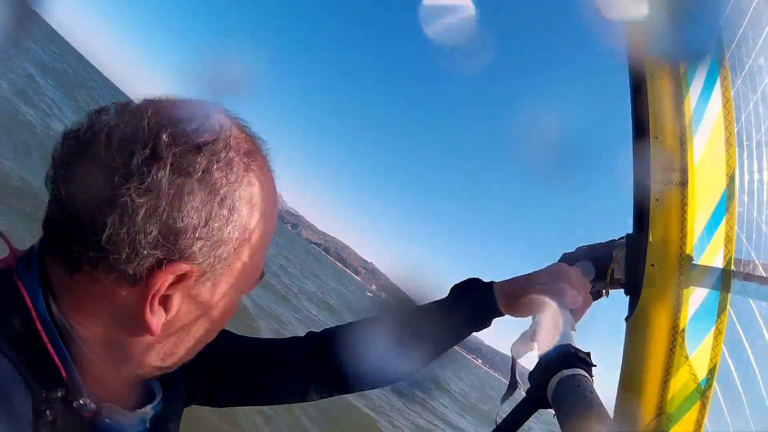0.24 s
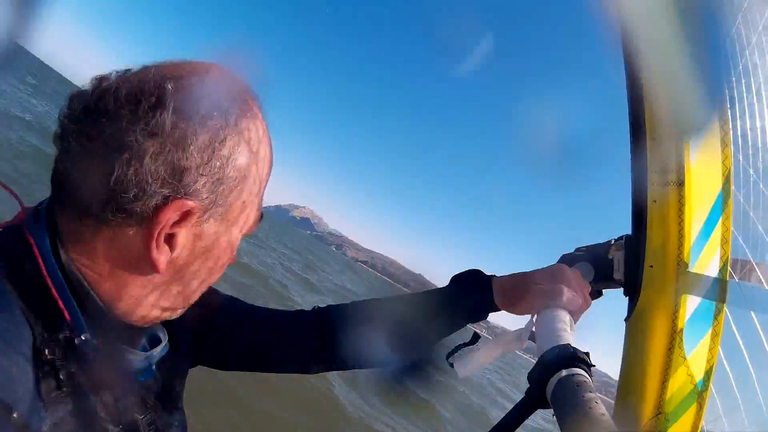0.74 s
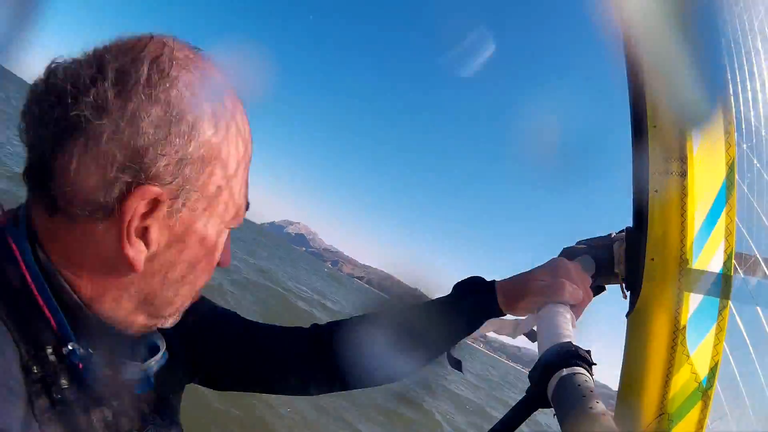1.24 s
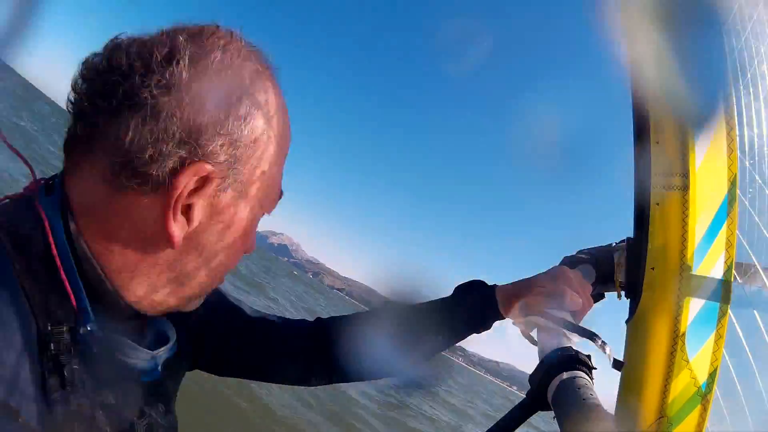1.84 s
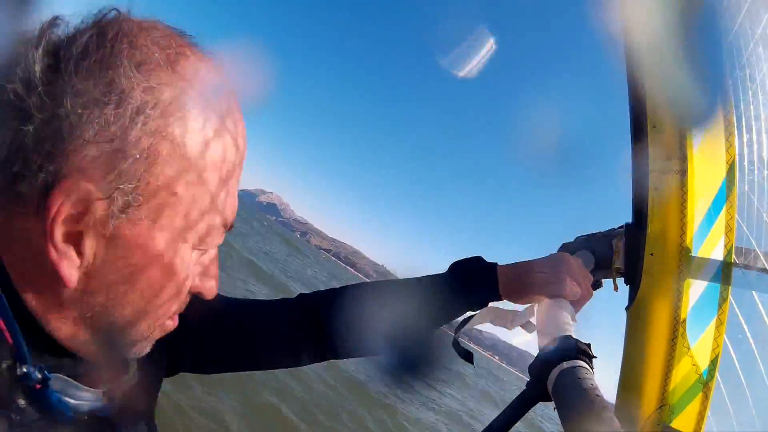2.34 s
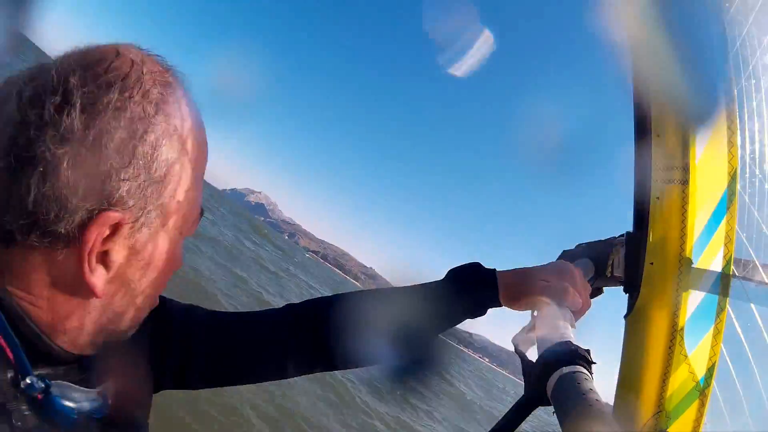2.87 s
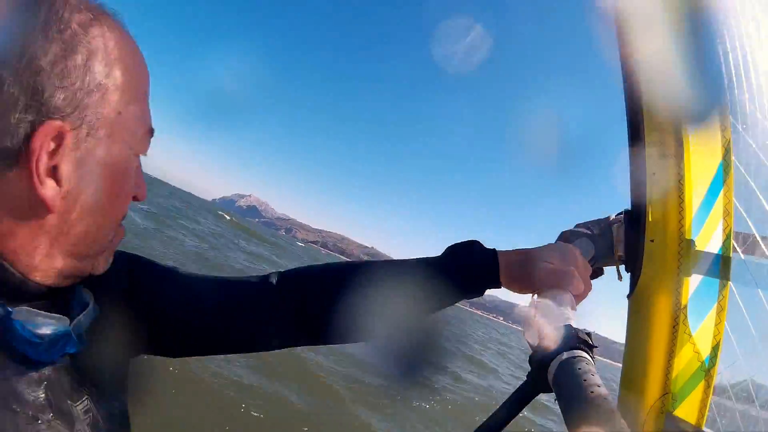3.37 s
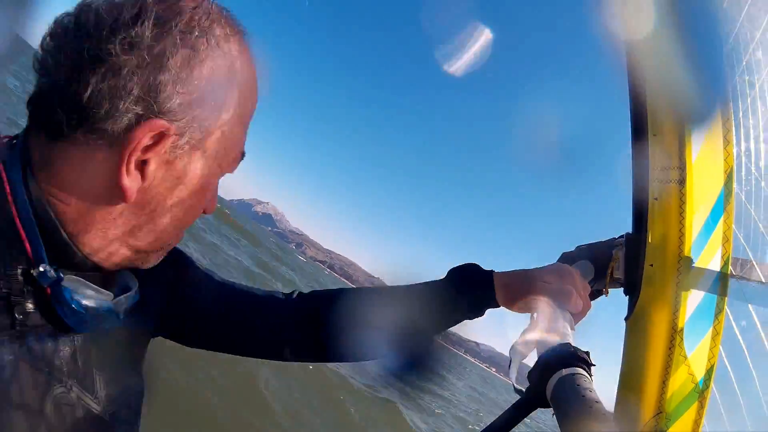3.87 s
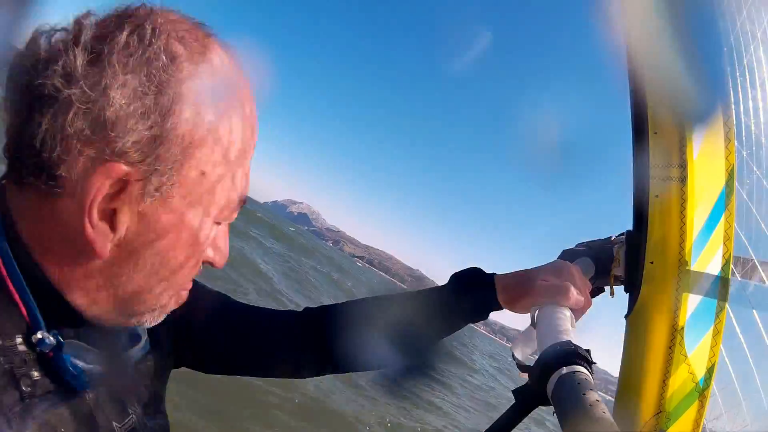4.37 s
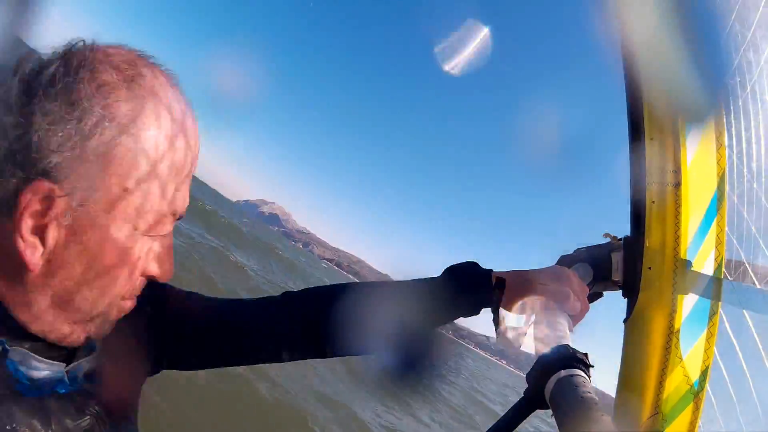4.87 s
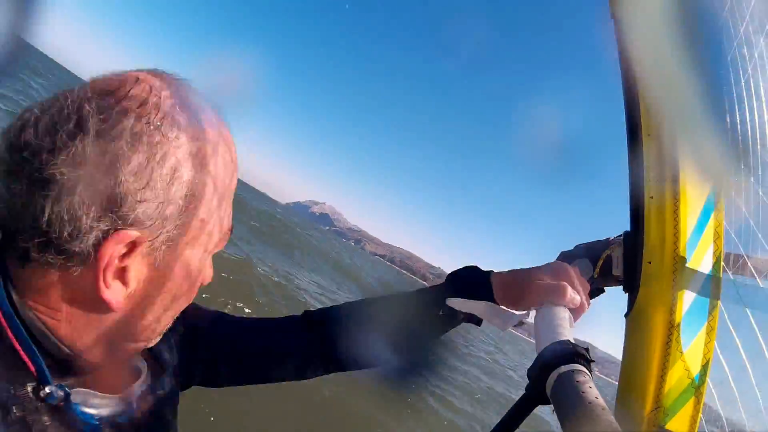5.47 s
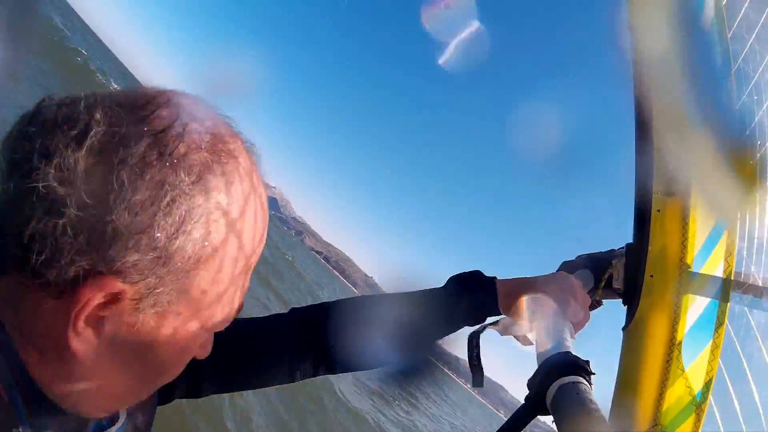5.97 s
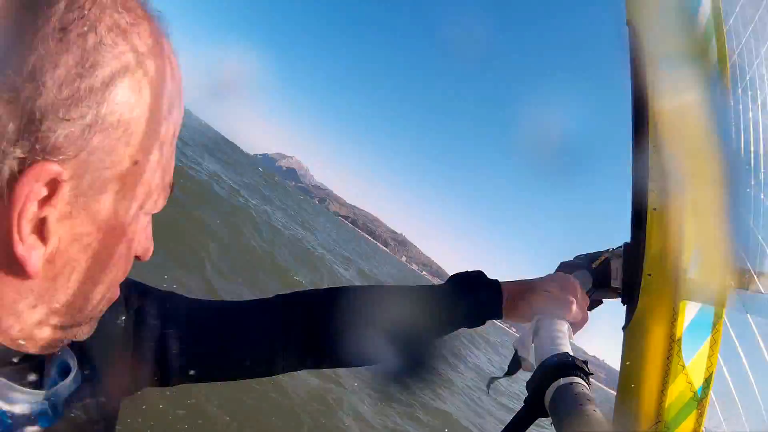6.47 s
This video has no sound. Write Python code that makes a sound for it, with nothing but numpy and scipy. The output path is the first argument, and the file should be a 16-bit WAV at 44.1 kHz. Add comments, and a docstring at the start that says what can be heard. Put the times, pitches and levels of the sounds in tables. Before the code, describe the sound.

Hollow thuds and wet slaps of a board hitting chop, heard boxy and muffled over surging wash, gurgles and low rumble.

```python
"""Windsurf board planing over chop

Heard by a microphone in a sealed case on the rig. The hull slams and slaps the waves as filtered
clusters of impacts, the rig shudders in short low oscillations, and a few drops of spray ring the case.
Showers of impacts and bubbles make the rushing water; low noise makes the wind that buffets the case.
The case wall muffles the blows; its resonances give blows, churn, wash and spray a hollow ring."""
import sys
import numpy as np
from scipy import signal
from scipy.fft import rfft, irfft
from scipy.io import wavfile
from scipy.ndimage import uniform_filter1d, minimum_filter1d

SR = 44100
rng = np.random.default_rng(int(sys.argv[2]) if len(sys.argv) > 2 else 0)


def dump_mix(stems):
    """Bounce the given channels to the path in sys.argv[1] as a 16-bit WAV at rate SR."""
    frames = np.atleast_2d(stems).T  # one column per channel
    limited = np.clip(frames, -1, 1)  # hard clip at full scale
    pcm = np.round(limited * 32767).astype(np.int16)
    wavfile.write(sys.argv[1], SR, pcm)


N = 296352
TIME = np.arange(N) / SR  # s

# Hull blows, levels before the hull trim: (time [s], low thud [dB], slap [dB], sharp crack [dB],
# time the water takes to break [s], hollowness [factor on the case resonances])
HULL_BLOWS = [(0.0615, -19.5, -35, -62, 0.0045, 1), (0.0805, -33.5, -32.5, -55, 0.0015, 1.5),
              (0.256, -42.5, -51.5, -82, .006, 2.23), (0.532, -29, -42.5, -53.5, 0.0015, 2.2),
              (0.570, -23, -31.5, -54, .0012, 0.95), (0.612, -27.5, -37, -63, 0.0041, 1.9),
              (0.63, -15.5, -35, -61, 0.00069, 0.82), (0.678, -24.5, -57, -85, .001, 1.24),
              (0.7263, -25.5, -48, -61, 0.0011, 1.2), (0.779, -41, -28.5, -62.5, 0.0033, 1.7),
              (1.0803, -27.5, -45, -60.5, 0.0029, 1.2), (1.2914, -37, -46.5, -87, 0.0025, 1.96),
              (1.967, -42.5, -54, -82, 0.0056, 0.58), (2.64, -11.5, -26, -35.5, 0.00078, 0.71),
              (2.676, -27, -39, -82, 0.0029, 1.3), (2.693, -39, -41, -83, 0.0017, 1.9),
              (2.879, -33.5, -47, -81, 0.0061, 0.83), (3.278, -53, -59, -78, 0.001, 0.72),
              (3.457, -31, -36, -65, 0.0024, 2.15), (3.571, -36, -35, -78, 0.0019, 1.9),
              (4.269, -54, -48.5, -60.5, 0.0012, 1.2), (4.5252, -40.5, -35.5, -67, 0.0011, 1.13),
              (5.1659, -16.5, -26.5, -38, 0.0012, 0.87), (5.2013, -27, -34, -65, 0.00095, 1.6),
              (5.231, -20, -42, -78, 0.00041, 0.75), (5.647, -33.5, -39.5, -66, 0.0019, 0.89),
              (5.718, -22, -44, -59, 0.0044, 0.89), (5.7371, -28.5, -32.5, -60, 0.0017, 1.1),
              (5.9094, -16, -26.5, -55, 0.0018, 1.56), (5.976, -35.5, -35.5, -72, 0.0025, 1.6),
              (6.028, -61, -49, -65, 0.0012, 1.2), (6.055, -45, -40.5, -67, 0.0018, 1.15),
              (6.089, -50, -41, -58.5, .0025, 1), (6.134, -33.5, -31, -57, 0.0074, 1.6),
              (6.1688, -28, -35, -58, 0.0084, 2.2), (6.199, -40, -46, -69, 0.0057, 2.3),
              (6.304, -26.5, -35, -64, 0.0044, 1.6), (6.3421, -12.5, -19.5, -35, 0.0011, 0.72),
              (6.392, -20.5, -42, -60, 0.0025, 0.95), (6.4077, -13, -22.5, -59, 0.0013, 0.36),
              (6.4454, -35, -43, -68, 0.0013, 2)]
KNOCK_DB, KNOCK_PER_HOLLOW_DB = -3.5, 7.5  # the wooden knock lies between thud and slap, grows with hollowness
SMACK_DB = 4.5  # the smack lies between slap and crack
TICK_DB, TICK_GROWTH = -3.5, 1.363  # the top tick grows faster than the crack: only hard slams have it


def hull(level_db=-0.42):
    """Impact excitation: each wave strikes the hull; thud, slap and crack set the bands between them."""
    out = np.zeros(N)
    for s, thud_db, slap_db, crack_db, break_s, hollow in HULL_BLOWS:
        knock_db = (thud_db + slap_db) / 2 + KNOCK_DB + KNOCK_PER_HOLLOW_DB * (hollow - 1)
        smack_db = (slap_db + crack_db) / 2 + SMACK_DB
        tick_db = TICK_DB + TICK_GROWTH * crack_db
        band_db = [thud_db, knock_db, slap_db, smack_db, crack_db, tick_db]
        add(out, s, blow(band_db, break_s, hollow))
    return gain_of(level_db) * out


# Edges of the six bands of a blow, thud to tick: (frequency [Hz])
BLOW_BAND_EDGES = [110, 400, 900, 1550, 2700, 5500, 16000]
# Transmission through the case wall: (frequency [Hz], relative level [dB])
WALL_TRANSMISSION = [(30, -21.5), (100, -2), (200, 5), (290, 0.5), (400, -9.5), (650, -3), (830, -15),
                     (1000, -18.5), (1400, -22.5), (1950, -31), (2800, -47.5), (4600, -60), (6000, -57.5),
                     (16000, -68)]


def blow(band_db, break_s, hollow, clean_hz=450, grain_db=5, tail_db=-33, tail_s=0.0048, size=8192):
    """Coherence of sources: a cluster of impacts merges into one push where the sound wave is long."""
    t, hz = np.arange(size) / SR, np.fft.rfftfreq(size, 1 / SR)
    age = t / max(break_s, .0005)
    unevenness = evened(uniform_filter1d(rng.standard_normal(size), size=90))
    grains = gain_of(grain_db * unevenness)

    # the impacts swell and die, then thrown water falls back
    impacts = age * np.exp(-age)
    falling_water = gain_of(tail_db) * np.minimum(age, 1) * np.exp(-t / tail_s)
    cluster = rng.standard_normal(size) * grains * (impacts + falling_water)
    low = 1 / (1 + 1j * hz / clean_hz)
    push = low + (1 - low) * rfft(cluster / np.linalg.norm(cluster))

    # a hull pressed into the water is damped; a light knock lets it ring
    wall = gain_of(read(WALL_TRANSMISSION, hz) + hollow * case_db(hz))
    power = 0
    for low_hz, high_hz, db in zip(BLOW_BAND_EDGES, BLOW_BAND_EDGES[1:], band_db):
        low_cut = (1 + (low_hz / (hz + 1)) ** 16) ** .5
        high_cut = (1 + (hz / high_hz) ** 20) ** .5
        band = wall / low_cut / high_cut
        power = power + (gain_of(db) * band / np.linalg.norm(irfft(band * push))) ** 2

    # the thud reaches softly down into the deep bass
    deep = wall * (hz < BLOW_BAND_EDGES[0])
    skirt = gain_of(band_db[0]) * deep / np.linalg.norm(irfft(wall))
    struck = irfft(push * causal(np.sqrt(power + skirt ** 2)))
    return struck * np.sqrt(.025 * SR)  # band levels are rms referred to 25 ms


# Short shudders of the rig, many of them as the board meets a wave, before the rig trim:
# (time of the crest [s], peak level [dB], frequency [Hz])
RIG_SHUDDERS = [(0.017, -26, 95), (0.074, -19, 105), (0.545, -13.5, 73.6), (0.604, -16, 79),
                (0.828, -25, 81), (1.248, -21.5, 83.6), (2.264, -20.5, 89), (2.68, -18.5, 103),
                (3.604, -23, 72), (4.238, -19.5, 76.5), (5.151, -16, 76), (5.208, -18, 81),
                (5.662, -15.5, 78), (6.325, -21, 68), (6.397, -23, 71.5), (6.581, -15, 83)]


def rig(swell_s=0.01, level_db=-2):
    """Transient oscillation: mast and boom shake for a few cycles under a bell-shaped envelope."""
    out = np.zeros(N)
    t = np.arange(-SR // 10, SR // 10) / SR
    for s, db, hz in RIG_SHUDDERS:
        envelope = gain_of(db) * np.exp(-.5 * (t / swell_s) ** 2)
        shake = envelope * np.cos(2 * np.pi * (hz * t + rng.random()))
        out += np.interp(TIME, s + t, shake, left=0, right=0)
    return gain_of(level_db) * out


# Spray drops on the case: (time [s], gain of the ring [dB], gain of the tick [dB])
SPRAY_DROPS = [(6.5176, -30, -44), (6.539, -8, -51), (6.552, -18, -52), (6.559, -42, -42),
               (6.5660, -33, -35), (6.615, -49, -48), (6.6410, -30, -47), (6.6643, -59, -50),
               (6.6795, -22.5, -34.5)]
# Modes that a drop excites: (frequency [Hz], relative level [dB], time to decay by 60 dB [s])
DROP_RING_MODES = [(663, -5.5, 0.044), (1264, 2.5, 0.033), (1460, 0.5, 0.01), (1750, -14, 0.051),
                   (3740, -30, 0.027), (4600, -21, 0.012)]


def drops(tick_s=0.00056, tick_hz=4800, soft_s=0.00041):
    """Modal excitation: a drop flattens on the case with a wet tick and sets off short decaying modes."""
    out, t = np.zeros(N), np.arange(SR // 10) / SR
    ring = 0
    for hz, db, t60 in DROP_RING_MODES:
        ring = ring + gain_of(db - 60 * t / t60) * np.sin(2 * np.pi * hz * t)
    ring = ring * (1 - np.exp(-(t / soft_s) ** 2))  # soft contact

    muffle = signal.butter(1, [tick_hz / 2, min(tick_hz, SR / 3)], "bandpass", fs=SR)
    tick_envelope = t / tick_s * np.exp(1 - t / tick_s)
    for s, ring_db, tick_db in SPRAY_DROPS:
        tick = signal.lfilter(*muffle, rng.standard_normal(len(t)) * tick_envelope)
        add(out, s, gain_of(ring_db) * ring + gain_of(tick_db) * tick)
    return out


# Spectra of heave, churn, wash and spray: (frequency [Hz], relative density [dB per Hz])
HEAVE_SPECTRUM = [(10, -15.5), (25, -10.5), (45, 9), (60, -15.5), (100, -21.5)]
CHURN_SPECTRUM = [(60, -20.5), (105, 1.5), (150, -2), (200, -1.5), (260, -13.5), (340, -10), (430, -13.5),
                  (700, -66.5)]
WASH_SPECTRUM = [(250, -11.5), (420, 0), (650, 1), (850, -0.5), (1100, -6.5), (1500, -5.5), (1950, -11.5),
                 (2400, -24.5), (3200, -57)]
SPRAY_SPECTRUM = [(1500, -28), (2400, -7.5), (3000, 1.5), (3900, -9.5), (4600, -4), (6000, -13),
                  (8000, -12.5), (11000, -26), (15000, -22.5)]
# Behaviour between waves, before the layer trims: (level on flat water [dB], fall after a wave [dB per s])
CHURN_DECAY = (-47, 91.5)
WASH_DECAY = (-54.5, 105)
SPRAY_DECAY = (-74.5, 79)
# Sheets of spray thrown against the sail, before the spray trim: (time [s], level [dB])
SPRAY_SHEETS = [(0.715, -59), (0.78, -50.5), (2.33, -61), (3.22, -64), (4.135, -57), (5.83, -49),
                (5.96, -55)]
SHEET_S = 0.0072  # half the time a sheet takes to land
SURGE_DB = 1.3  # rms variation of the water noise from moment to moment


def water(heave_db=-10, gurgle_db=-10, lap_db=-9, wash_db=-1, spray_db=-1):
    """Superposition of random impacts: churn, wash and spray surge together while the board heaves."""
    _, _, churns_db, washes_db, sprays_db, _ = np.transpose(RUN_WAVES)
    surge = gain_of(SURGE_DB * flutter(rate_hz=41))

    churning = swell(churns_db, *CHURN_DECAY)
    churn = coloured(patter(per_s=900, spread_db=2.5) * surge, CHURN_SPECTRUM) * churning

    # the heave grows faster than the churn
    heaving = gain_of(heave_db) * churning * evened(churning) ** 0.25
    heave = coloured(rng.standard_normal(N), HEAVE_SPECTRUM, ring=0) * heaving

    froth = patter(per_s=2500, spread_db=0.5)
    froth = froth + gain_of(gurgle_db) * gurgle()
    froth = froth + gain_of(lap_db) * patter(per_s=26, spread_db=-0.5)  # ripples tap the hull one by one
    washing = gain_of(wash_db) * swell(washes_db, *WASH_DECAY)
    wash = coloured(froth * surge, WASH_SPECTRUM) * washing

    sheets = sum(gain_of(db) * np.exp(-.5 * ((TIME - s) / SHEET_S) ** 2) for s, db in SPRAY_SHEETS)
    spraying = gain_of(spray_db) * np.hypot(swell(sprays_db, *SPRAY_DECAY), sheets)
    spray = coloured(patter(per_s=5800, spread_db=0.0) * surge, SPRAY_SPECTRUM) * spraying
    return heave + churn + wash + spray


def gurgle(per_s=260, cycles=5, count=30):
    """Bubble resonance: each size rings for a few cycles and rises a little in pitch; rms 1."""
    t, out = np.arange(2048) / SR, 0
    for hz in np.geomspace(420, 2200, count):
        age = hz * t / cycles
        bubble = np.exp(-age) * np.sin(2 * np.pi * hz * t * (1 + 0.019 * age))
        births = patter(per_s=per_s / count, spread_db=1.0)
        out = out + hz * signal.oaconvolve(births, bubble)[:N]
    return evened(out)


# Waves that the board runs through, levels before the layer trims: (time [s], time in the wave [s],
# low churn [dB], wash [dB], spray [dB], buffeting of the case [dB])
RUN_WAVES = [(-0.061, 0.13, -32.5, -41.5, -65.5, -35.5), (0.199, 0.047, -41.5, -44.5, -65.0, -36),
             (0.511, 0.26, -30.5, -42, -66, -37), (0.735, 0.0079, -28.5, -31.5, -61, -45),
             (0.939, 0.15, -34.5, -42.0, -63.5, -35), (1.167, 0.15, -41, -47.0, -70, -40.5),
             (1.559, 0.14, -41.0, -45, -66, -39), (1.725, 0.043, -37.5, -41, -66, -32),
             (1.99, 0.07, -46.5, -46.5, -69, -39), (2.191, 0.26, -41, -45.5, -67.5, -42.5),
             (2.549, 0.14, -36.5, -40.5, -67, -40), (2.73, 0.18, -36.5, -44.5, -68.5, -39),
             (3.18, 0.0025, -46, -44.5, -69, -43), (3.319, 0.184, -44, -46, -65.5, -40.5),
             (3.532, 0.17, -42.5, -48, -69, -36.5), (4.073, 0.19, -42.5, -43.5, -66, -42.5),
             (4.46, 0.125, -46.5, -47, -69.5, -31.5), (4.584, 0.091, -39.5, -41, -62.5, -35.5),
             (5.075, 0.14, -29.5, -38, -62, -40), (5.364, 0.023, -31, -36.5, -65, -40.5),
             (5.609, 0.22, -32.5, -37, -62, -33.5), (5.909, 0.019, -33, -43.5, -64.5, -43),
             (6.075, 0.087, -36.5, -42.5, -68.5, -43), (6.301, 0.06, -39, -39.5, -73, -30),
             (6.478, 0.17, -31.5, -39.5, -62, -37)]
ENTRY_S = 0.029  # the hull sinks into a wave in this time


def swell(peaks_db, calm_db, fall_db_per_s, lag_s=0):
    """Addition of powers: each wave rises, holds while the hull is in it and dies away over a calm bed."""
    power = gain_of(calm_db) ** 2
    for (s, hold_s, *_), db in zip(RUN_WAVES, peaks_db):
        age = TIME - s - lag_s
        rise = np.clip(age / ENTRY_S, 0, 1)
        wave = rise * gain_of(db - fall_db_per_s * np.maximum(age - hold_s, 0))
        power = power + wave ** 2
    return np.sqrt(power)


# Spectrum of the buffeting: (frequency [Hz], relative density [dB per Hz])
BUFFET_SPECTRUM = [(30, -6.5), (50, -13.5), (72, 10), (100, -1.5), (135, -8.5), (250, -31)]
# Buffeting between waves, before the wind trim: (calm level [dB], fall after a wave [dB per s])
BUFFET_DECAY = (-57.5, 81)
SWING_S = 0.029  # the rig swings this long after the hull meets a wave


def wind(level_db=-1.5):
    """Turbulent pressure: lumpy low noise buffets the case, strongest as the rig swings after a wave."""
    gusts = rng.standard_normal(N) * gain_of(1.5 * flutter(rate_hz=18))
    buffets_db = [row[-1] for row in RUN_WAVES]
    buffeting = gain_of(level_db) * swell(buffets_db, *BUFFET_DECAY, SWING_S)
    return coloured(gusts, BUFFET_SPECTRUM, ring=0) * buffeting


def patter(per_s, spread_db):
    """Shot noise: small water impacts at random times, of uneven size and random sign; rms 1."""
    size = gain_of(spread_db * np.minimum(rng.exponential(1, N), 5))
    return evened(size * rng.choice([-1, 1], N) * (rng.random(N) < per_s / SR))


def flutter(rate_hz):
    """Low-passed noise: slow random variation, mostly below a rate; rms 1."""
    hz = np.fft.rfftfreq(N, 1 / SR)
    return evened(irfft(rfft(rng.standard_normal(N)) / (1 + (hz / rate_hz) ** 4), N))


# Resonances of case and rig, before scaling by hollowness: (frequency [Hz], width [Hz], peak [dB])
CASE_RESONANCES = [(155.7, 35.6, 8.5), (326.7, 99, 8.5), (505, 88, 7), (664, 18, 3), (1127.5, 113, 9.5),
                   (1273, 220, 9.5), (1840, 210, 4), (2364, 930, 7.5), (3895, 920, 11), (7800, 780, 1.5)]


def case_db(hz):
    """Resonance: the response of the case peaks around each of its modes."""
    return sum(db / (1 + (2 * (hz - f) / width) ** 2) for f, width, db in CASE_RESONANCES)


def coloured(x, spectrum, ring=1, size=4096):
    """Linear filtering: x takes on a spectrum, closed off above its last point, and the case ring; rms 1."""
    hz = np.fft.rfftfreq(size, 1 / SR)
    closing = np.maximum(hz / spectrum[-1][0], 1) ** 4
    gain = gain_of(read(spectrum, hz) + ring * case_db(hz)) / closing
    return evened(signal.oaconvolve(x, irfft(causal(gain)))[:N])


def causal(gain):
    """Minimum phase: the spectrum with this gain that rings only after it is struck."""
    log_gain = np.log(np.maximum(gain, gain.max() * 1e-5))
    circle = np.concatenate([log_gain, log_gain[-2:0:-1]])
    return np.exp(np.conj(signal.hilbert(circle)))[:len(gain)]


def read(points, hz):
    """Logarithmic frequency scale: interpolates a spectrum table along it."""
    f, value = np.transpose(points)
    return np.interp(np.log(hz + 1), np.log(f + 1), value)


def gain_of(db):
    """Decibel law: converts a level to an amplitude factor."""
    return 10 ** (np.asarray(db) / 20)


def evened(x):
    """Root mean square: scales a signal to rms 1."""
    return x / np.sqrt(np.mean(x ** 2) + 1e-20)


def add(mix, s, sound):
    """Superposition: adds a sound to the mix, in place, from time s."""
    part = mix[max(round(s * SR), 0):][:len(sound)]
    part += sound[:len(part)]


def scene():
    """Superposition: everything reaches one microphone inside the case."""
    return (hull() + rig() + drops() + water() + wind())[None]


# Spectrum of the microphone hiss: (frequency [Hz], relative density [dB per Hz])
HISS_SPECTRUM = [(30, 0), (3000, 0.56), (8000, -0.27), (14000, -0.45), (16000, -1.5)]
EDGE_HZ = 15900  # upper band limit


def record(dry):
    """Self-noise, limiting and band limit: hiss is added, peaks are held down, the top is cut off."""
    hiss = gain_of(-72.5) * coloured(rng.standard_normal(N), HISS_SPECTRUM, ring=0)
    x = dry + hiss
    allowed = np.minimum(1, .71 / (abs(x) + 1e-9))
    # the lowest gain nearby, smoothed over about 1 ms
    x = x * uniform_filter1d(minimum_filter1d(allowed, size=45), size=45)
    band_limit = signal.firwin(511, EDGE_HZ, window=("kaiser", 9), fs=SR)
    return signal.oaconvolve(x, band_limit[None], "same")


dry = scene()
out = record(dry)
dump_mix(out)
```